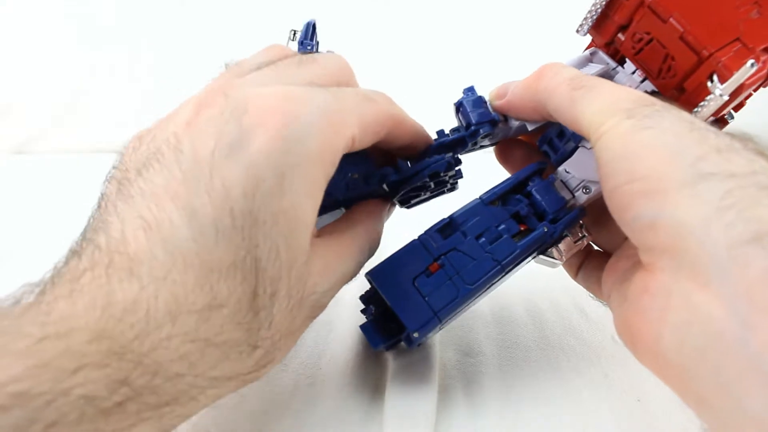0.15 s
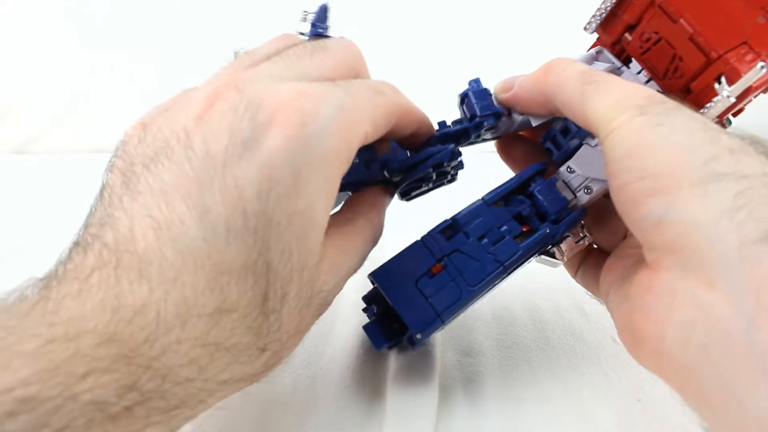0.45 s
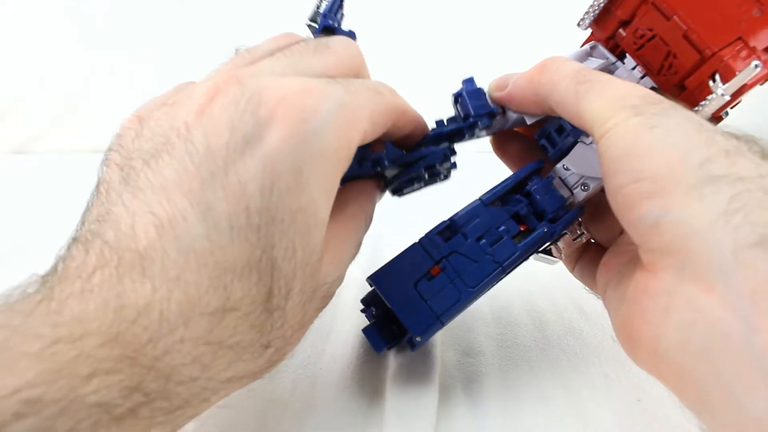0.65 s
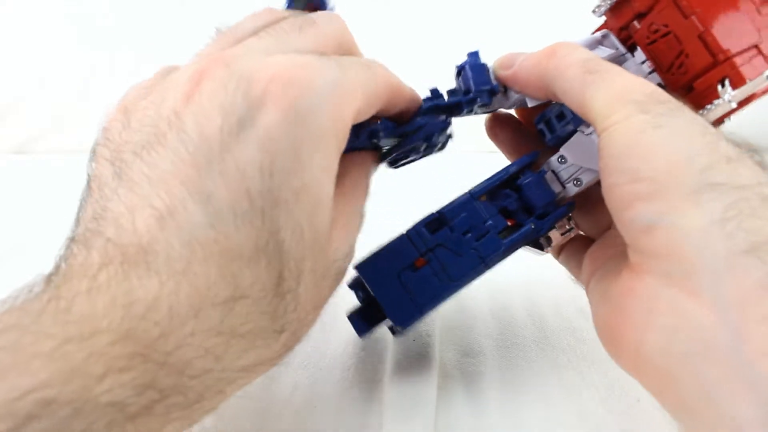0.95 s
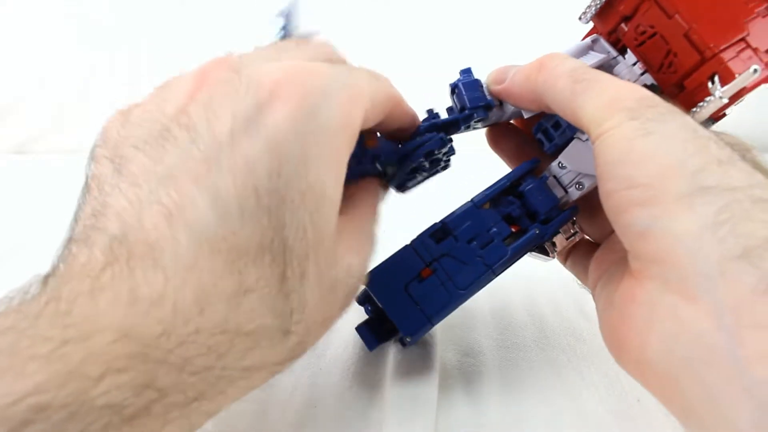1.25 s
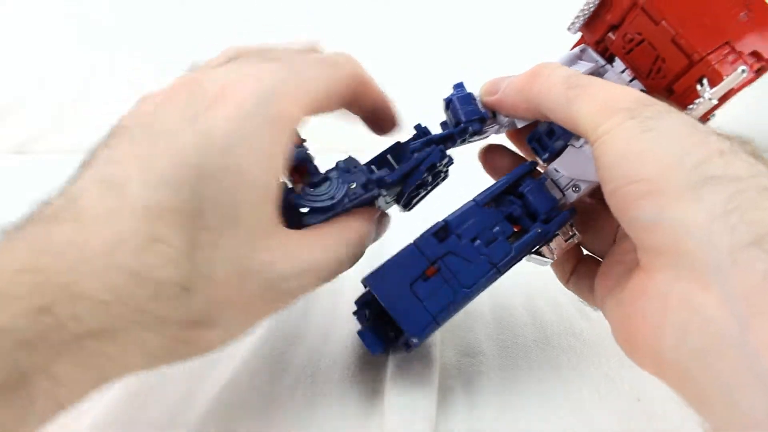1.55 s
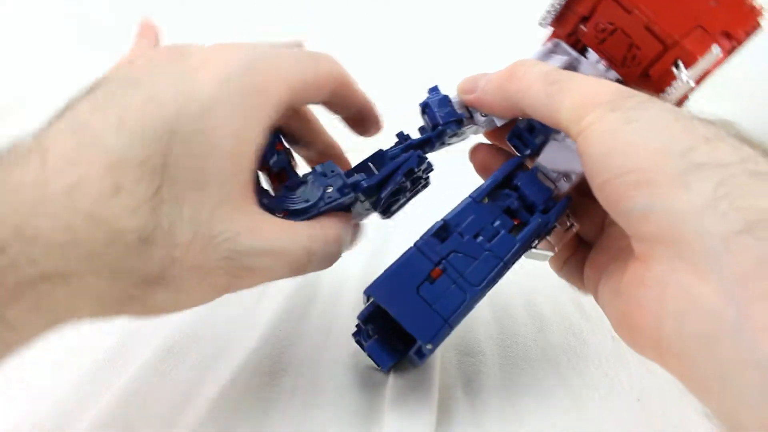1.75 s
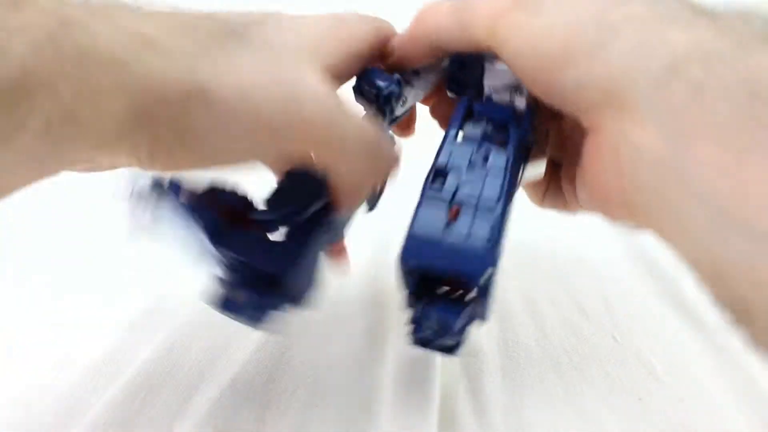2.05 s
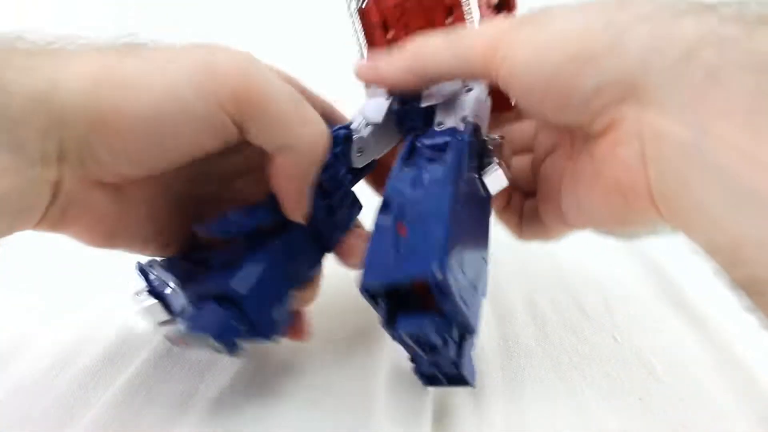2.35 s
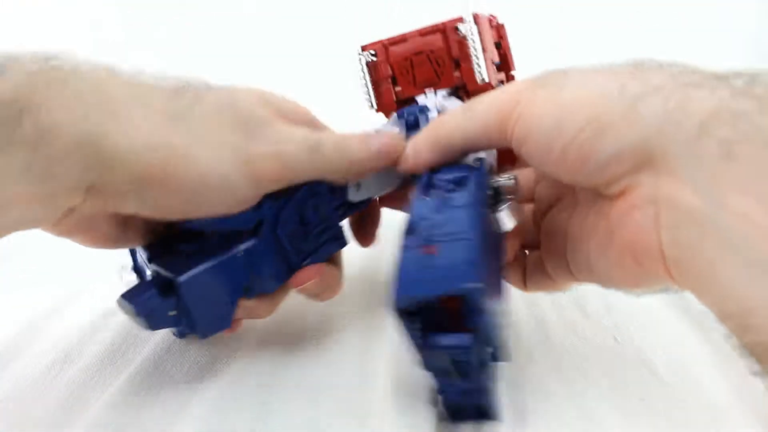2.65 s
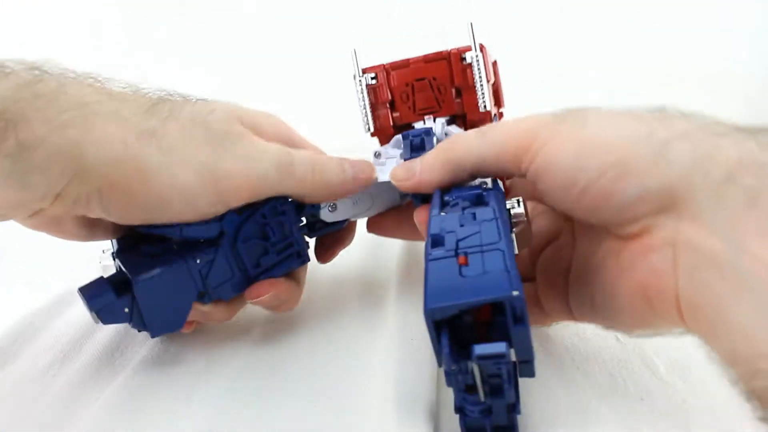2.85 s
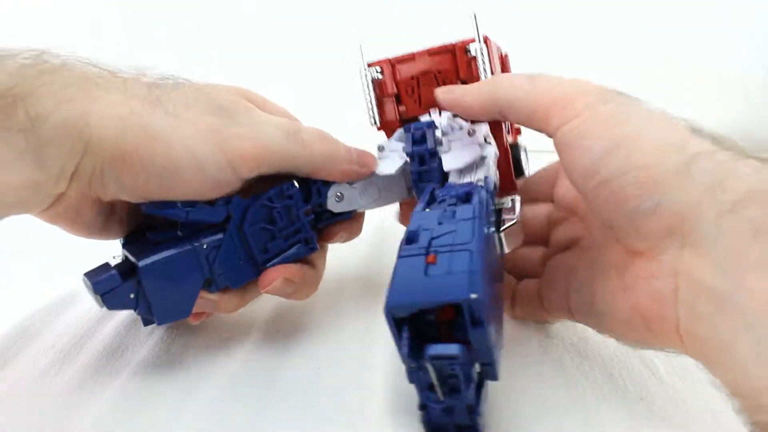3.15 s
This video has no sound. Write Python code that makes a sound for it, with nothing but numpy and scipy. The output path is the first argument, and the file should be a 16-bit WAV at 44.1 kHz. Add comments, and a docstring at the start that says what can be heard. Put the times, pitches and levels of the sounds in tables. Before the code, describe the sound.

A hard plastic toy is folded by hand, close to the microphone in a quiet, slightly reflective room. Crisp clicks cluster from 0 to 0.4 s, with a faint metallic pin ring, and one tick at 0.7. Sparse faint clicks and a low thump follow. From 1.85 come clicks, hissy rubbing and hollow cloth scraping, a dull landing at 2.3, three loudest snaps at 2.67-2.76 with table thumps, then small ticks near 3.2.

```python
"""Hard plastic toy in two hands

Two hands turn and fold a hard plastic toy on a cloth-covered table in a quiet room.
Joints tick and a ratchet snaps three times: sprays of impacts through shell modes and a noisy crack.
The table thumps into the microphone stand (dying sines), which also sways (infra-low noise).
The toy slides, lands and drags on the cloth (shaped noise); a hinge pin rings; the room reflects the toy."""
import sys
import numpy as np
from scipy import signal
from scipy.fft import rfft, irfft
from scipy.io import wavfile

SR = 44100
rng = np.random.default_rng(int(sys.argv[2]) if len(sys.argv) > 2 else 0)


def log_audio(samples):
    """Write samples as a 16-bit WAV file to the path given in sys.argv[1]."""
    # one column per channel
    frames = np.atleast_2d(samples).T
    # limit to full scale, then quantise
    limited = np.clip(frames, -1, 1)
    pcm = np.round(limited * 32767).astype(np.int16)
    wavfile.write(sys.argv[1], SR, pcm)


def gain_from_db(level_db):
    """Turn a decibel level (scalar or array-like) into a linear amplitude factor."""
    decades = np.asarray(level_db, float) / 20
    return 10 ** decades


N = 145530


def rms_one(x):
    """Scales to rms 1."""
    return x / np.sqrt(np.mean(x ** 2) + 1e-20)


def at_hz(points, hz):
    """Reads a (Hz, value) curve on a log frequency axis."""
    points_hz, values = np.transpose(points)
    return np.interp(np.log(hz), np.log(points_hz), values)


def in_time(rows):
    """Interpolates each column of (s, value, ..) over the scene."""
    s, *columns = np.transpose(rows)
    t = np.arange(N) / SR
    return [np.interp(t, s, column) for column in columns]


def band_pass(order, low_hz, high_hz, x):
    """Butterworth band-pass."""
    return signal.sosfilt(signal.butter(order, [low_hz, high_hz], "band", fs=SR, output="sos"), x)


def drift(rate_hz):
    """Slow random wander, rms 1: noise through a double one-pole low-pass."""
    r = np.exp(-2 * np.pi * rate_hz / SR)
    wander = signal.lfilter([1], [1, -2 * r, r * r], rng.standard_normal(N + SR))
    return rms_one(wander[SR:])  # the first second settles the filter


def coloured(spectrum):
    """Noise with a given (Hz, dB) spectrum, rms 1."""
    hz = np.maximum(np.fft.rfftfreq(N, 1 / SR), 1)
    return rms_one(irfft(rfft(rng.standard_normal(N)) * gain_from_db(at_hz(spectrum, hz)), N))


def struck(modes, extra_db, samples):
    """Sum of dying sines from (Hz, dB, t60 s) modes."""
    t = np.arange(samples) / SR
    hz, db, t60_s = np.transpose(modes)[:, :, None]
    envelope = gain_from_db(db + extra_db[:, None] - 60 * t / t60_s)
    return np.sum(envelope * np.sin(2 * np.pi * hz * t), axis=0)


def lay(events):
    """Places (s, peak dB, sound) on the time line."""
    out = np.zeros(N + SR)
    for s, db, sound in events:
        i = max(int(s * SR), 0)
        out[i:i + len(sound)] += gain_from_db(db) * sound / np.abs(sound).max()
    return out[:N]


def air():
    """Steady background noise of the quiet room, mostly low."""
    # noise spectrum: (frequency [Hz], relative level [dB])
    spectrum = [(18, -44.5), (30, 1.5), (56, -5.5), (163, -14.5), (222, -9.5), (312, -16.5), (415, -12),
                (645, -23), (1110, -24), (1780, -34), (12200, -46.5), (15000, -59.5)]
    level_db = -68.5
    return gain_from_db(level_db) * coloured(spectrum)


def sway():
    """The stand sways as arms lean on the table: infra-low noise."""
    # sway level: (time [s], level [dB])
    levels = [(0.0, -86), (0.57, -62), (0.61, -83), (0.84, -72.5), (0.93, -82.5), (1.27, -52), (1.36, -59),
              (1.86, -47.5), (2.23, -65), (2.31, -54), (2.58, -68), (2.89, -50), (3.01, -66.5),
              (3.3, -70.5)]
    wobble = band_pass(2, 13, 25.2, rng.standard_normal(N + SR))[SR:]
    return gain_from_db(in_time(levels)[0]) * rms_one(wobble)


def friction(resonances):
    """Gritty noise through resonances that each waver in strength; rms 1."""
    grain = rng.standard_normal(N) * gain_from_db(0.5 * drift(90))
    out = 0
    for k, (hz, width_hz, db) in enumerate(resonances):
        r = np.exp(-np.pi * width_hz / SR)
        zeros = [(1 - r * r) / 2, 0, (r * r - 1) / 2]
        poles = [1, -2 * r * np.cos(2 * np.pi * hz / SR), r * r]
        sign = (-1) ** k
        out = out + sign * gain_from_db(db + 3.1 * drift(9)) * signal.lfilter(zeros, poles, grain)
    return rms_one(out)


def slide():
    """Friction as the toy is turned and dragged: bright hiss, hollow scrape, grainy rub."""
    # friction: (time [s], fingertip hiss [dB], hollow scrape on the cloth [dB], rub in the joints [dB])
    levels = [(0, -82, -89, -86), (.1, -83.5, -88, -78), (.16, -84, -90, -60), (.3, -92, -98, -68),
              (.45, -101, -104, -91), (.62, -105, -90, -107), (.69, -85.5, -95, -76), (.82, -106, -82, -90),
              (.94, -94, -80, -96), (1.0, -105, -81.5, -75), (1.14, -97, -111, -91), (1.3, -100, -91, -100),
              (1.37, -99, -77, -72.5), (1.45, -69, -77.5, -69), (1.55, -92, -71, -82),
              (1.65, -103, -83, -100), (1.77, -82.5, -86, -83.5), (1.86, -60.5, -72.5, -62.5),
              (2.0, -62, -65.5, -63), (2.15, -68.5, -66.5, -72.5), (2.25, -81, -59.5, -64),
              (2.35, -75.5, -58.5, -74), (2.5, -82, -61, -73.5), (2.62, -95, -81.5, -73),
              (2.75, -100, -85.5, -58.5), (3.3, -97, -94, -119)]
    # fingertip hiss spectrum: (frequency [Hz], relative level [dB])
    hiss_spectrum = [(2650, -19), (4500, -11), (4820, -29.5), (5510, -2.5), (6740, -21), (7490, -6.5),
                     (8030, -1.5), (10500, -1.5), (14800, -12), (16000, -27)]
    # hollow resonances on the cloth: (frequency [Hz], width [Hz], relative level [dB])
    scrape_resonances = [(377, 200, -6), (669.6, 130, -8), (1028, 71, 3.5), (1520, 80, -15.5),
                         (1868, 190, -10)]
    # resonances of the rubbing joints: (frequency [Hz], width [Hz], relative level [dB])
    rub_resonances = [(1950, 320, 2.5), (2700, 800, -2.5), (3887, 440, 2.5), (5260, 220, -5.5)]
    hiss_db, scrape_db, rub_db = in_time(levels)
    hiss = gain_from_db(hiss_db + 1.5 * drift(40)) * coloured(hiss_spectrum)
    scrape = gain_from_db(scrape_db) * friction(scrape_resonances)
    rub = gain_from_db(rub_db) * friction(rub_resonances)
    return hiss + scrape + rub


def clicks():
    """Each click sprays tiny impacts into shell modes and a broad crack around the hit part's pitch."""
    # clicks of parts: (time [s], peak before the low cut [dB], pitch of the part [Hz],
    # extra on modes under 2.8 kHz before the hollow lift [dB], crack over 9 kHz before the top lift [dB])
    hits = [(0.0445, -58, 3830, -5, -20), (0.1117, -43, 5470, -37, -32), (0.1188, -28, 5660, -11, -15),
            (0.171, -41.5, 3500, -13, -27), (0.1854, -45, 6900, -5, -6), (0.2016, -32.5, 1950, -11, -10),
            (0.2788, -44, 3850, -28, -5), (0.2934, -42.5, 2290, -7, -49), (0.3456, -35, 5850, -44, -12.5),
            (0.3574, -61, 5700, -16, -7), (0.6963, -40.5, 4120, -27, -8), (0.7844, -67, 4130, -24, -29),
            (0.935, -68.5, 2500, -6, -20), (0.9862, -48.5, 3860, -29, -30), (1.0044, -73, 5080, -18, -22),
            (1.013, -60, 4180, -18, -11.5), (1.057, -57, 4250, -25, 8), (1.1083, -67, 1950, -9, -11.5),
            (1.3184, -61.5, 2450, 5, -25), (1.3769, -54, 2340, 4, -40), (1.4027, -68, 2410, -17, -13),
            (1.4563, -38.5, 2130, -13, -14), (1.5394, -85, 4250, -4, -11.5), (1.8676, -32, 4860, -46, -1),
            (1.9739, -43, 1880, -6.5, -12), (2.0258, -54, 5330, -9, -6), (2.1139, -42, 3800, -9, -13),
            (2.162, -43.5, 7100, -28, -9), (2.171, -38.5, 4300, -11.5, -24), (2.1925, -46, 2020, -3, 6),
            (2.229, -51, 1820, -16, -6), (2.253, -48.5, 5740, -16, -14.5), (2.287, -52.5, 1850, -20, -25),
            (2.3067, -55, 1920, -4, -16), (2.3246, -41.5, 3800, -14, -8.5), (2.355, -48, 1950, -18, -33),
            (2.4214, -29, 7480, -15.5, -47), (2.5631, -43, 6360, -11, -2.5), (2.597, -63, 2350, -16, 1),
            (2.6064, -48, 6400, -30, -9.5), (2.6175, -40, 6200, -50, -26.5), (2.6424, -49.5, 2010, 11, 2.5),
            (2.6748, -13.5, 6550, -23.5, -7), (2.7197, -12.5, 6220, -15, -3),
            (2.7612, -12, 6110, -27, -0.5), (3.1118, -68, 2990, -2, -20.5), (3.1926, -40, 9000, -16.5, 6),
            (3.2182, -50.5, 4760, -31, -35)]
    # strongest modes of the toy's shells: (frequency [Hz], relative level [dB], t60 [s])
    shell = [(1050, -2, .025), (1450, -5, .015), (1950, 4, .016), (2400, -10, .01), (3000, -4, .008),
             (3850, -4, .007), (4700, -2, .007), (5200, -2, .007), (6150, -2, .006), (6750, -2, .006),
             (7650, -6, .005)]
    hollow_lift_db, top_lift_db, crack_db = 3, 5, 1.5
    focus_peak_db, focus_oct = 6, 0.18  # modes near the part's pitch ring more
    crack_half_oct, crack_lowest_centre_hz = 0.55, 3800
    samples = 2000
    hz = np.array(shell)[:, 0]
    t = np.arange(samples) / SR
    loudest_db = max(row[1] for row in hits)
    pulse = np.r_[1., np.zeros(samples - 1)]
    top = band_pass(3, 9000, 16200, pulse)
    out = []
    for s, db, pitch_hz, low_db, top_db in hits:
        # softer clicks touch longer
        touch_peak_s = 0.00105 + 0.0000259 * (loudest_db - db)
        touch = t / touch_peak_s
        # contact, then loose parts rattle on
        spray = touch * np.exp(1 - touch) + gain_from_db(-20.5 - 60 * t / 0.095)
        noise = rng.standard_normal(samples)
        impacts = spray * noise * np.abs(noise) ** 0.7  # the power makes it spikier

        focus_db = focus_peak_db * np.exp(-(np.log2(hz / pitch_hz) / focus_oct) ** 2)
        hollow_db = (low_db + hollow_lift_db) * (hz < 2800)
        scatter_db = 1.5 * rng.standard_normal(len(shell))
        ring = struck(shell, hollow_db + focus_db + scatter_db, samples) / len(shell)

        # the many small modes blur into a crack
        centre_hz = max(pitch_hz, crack_lowest_centre_hz)
        mid = band_pass(3, centre_hz * 2 ** -crack_half_oct, centre_hz * 2 ** crack_half_oct, pulse)
        crack = mid - gain_from_db(top_db + top_lift_db) * top
        body = ring + gain_from_db(crack_db) * crack
        out.append((s, db, signal.fftconvolve(body, impacts)))
    low_cut = signal.butter(6, 1225, "high", fs=SR, output="sos")
    return signal.sosfilt(low_cut, lay(out))


def room(x):
    """Dense reflections: bands of noise that die at their own rates."""
    # decay of the room: (frequency [Hz], t60 [s])
    decay = [(600, .35), (1500, 0.33), (4000, 0.42), (9000, 0.41), (15000, 0.1)]
    level_db, rise_s, lowest_hz = -10, 0.002, 700
    t = np.arange(SR // 2) / SR
    edges_hz = lowest_hz * 2 ** np.arange(0, 4.6, .5)
    tail = 0
    for low_hz, high_hz in zip(edges_hz, edges_hz[1:]):
        band = band_pass(2, low_hz, high_hz, rng.standard_normal(len(t)))
        tail = tail + band * gain_from_db(-60 * t / at_hz(decay, np.sqrt(low_hz * high_hz)))
    tail = tail * np.clip(t / rise_s, 0, 1) ** 2
    tail = tail / np.sqrt(np.sum(tail ** 2))
    return gain_from_db(level_db) * signal.fftconvolve(x, tail)[:N]


def thumps():
    """Knocks carried by the table: soft pushes ring its modes."""
    # knocks: (time [s], peak [dB], extra on modes over 130 Hz [dB])
    knocks = [(0.06, -64.5, -8), (0.286, -57.5, -11), (0.482, -59, -32), (0.798, -61, -19),
              (1.099, -42, -10), (1.147, -57.5, 3), (1.572, -48.5, -24), (1.601, -56, 1),
              (1.665, -47.5, -20), (1.697, -46, 10), (1.74, -53.5, 8), (1.781, -51, 9), (2.32, -40.5, -20),
              (2.343, -58, 2), (2.681, -31.5, -10.5), (2.729, -39.5, -4.5), (2.77, -51, -22),
              (2.823, -37.5, -18.5), (2.871, -51, -10.5), (2.92, -67.5, -10.5), (3.081, -56, -26.5)]
    # modes of the table: (frequency [Hz], relative level [dB], t60 [s])
    modes = [(46.75, 0.5, .25), (79, -2, 0.39), (102.6, 8, .15), (161.8, 2.5, 0.31), (235, -12, 0.15)]
    push_s = 0.012
    samples = int(.4 * SR)
    hz = np.array(modes)[:, 0]
    rise = np.clip(np.arange(samples) / SR / push_s, 0, 1) ** 2
    out = []
    for s, db, upper_db in knocks:
        scatter_db = 1.8 * rng.standard_normal(len(modes))
        out.append((s, db, rise * struck(modes, upper_db * (hz > 130) + scatter_db, samples)))
    return lay(out)


def pin():
    """A loose metal hinge pin rings on unevenly: dying sines that waver in level."""
    # strikes: (time [s], peak before the wavering [dB])
    strikes = [(0.348, -57), (0.399, -65.5)]
    # modes of the pin: (frequency [Hz], relative level [dB], t60 [s])
    modes = [(5570, -2.5, 0.31), (6650, -9, 0.27), (3990, -5.5, 0.15)]
    ring = struck(modes, np.zeros(len(modes)), int(.4 * SR))
    return lay([(s, db, ring) for s, db in strikes]) * gain_from_db(6.5 * drift(45))


def landing():
    """The toy lands on the cloth and drags to a stop: a dull noise rattle that starts at once and dies."""
    # rattle spectrum: (frequency [Hz], relative level [dB])
    spectrum = [(71, -41), (120, -6), (178, -10), (291, -10), (374, -6), (509, -10), (785, -20),
                (1010, -19.5), (1200, -23.5), (1560, -49.5), (2640, -120)]
    start_s, level_db, t60_s, rise_s = 2.319, -40.5, 0.45, 0.012
    t = np.arange(N) / SR - start_s
    decay = gain_from_db(level_db - 60 * np.maximum(t, 0) / t60_s)
    return np.clip(t / rise_s, 0, 1) * decay * coloured(spectrum)


def scene():
    """Sums all layers; only clicks and pin excite the room."""
    toy = clicks() + pin()
    mix = air() + sway() + slide() + toy + room(toy) + thumps() + landing()
    return mix[None]


def roll_off(x):
    """The treble ends steeply here."""
    return signal.sosfilt(signal.butter(12, 16850, fs=SR, output="sos"), x)


def record(dry):
    """The microphone's top end falls away above 14.6 kHz."""
    mic_low_pass = signal.butter(6, 14630, fs=SR, output="sos")
    mix = signal.sosfilt(mic_low_pass, dry)
    return roll_off(mix)


dry = scene()
out = record(dry)
log_audio(out)
```